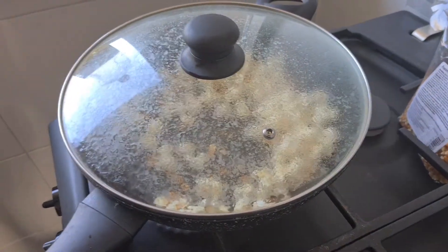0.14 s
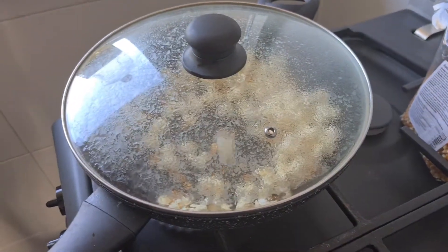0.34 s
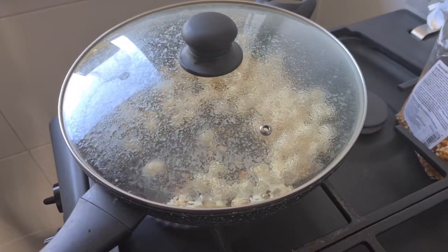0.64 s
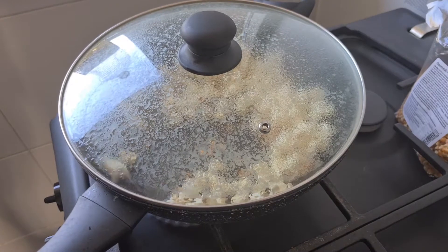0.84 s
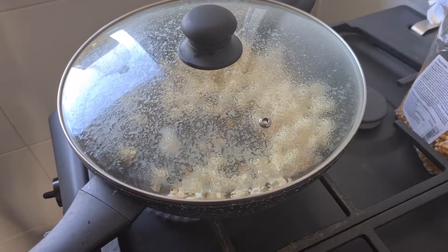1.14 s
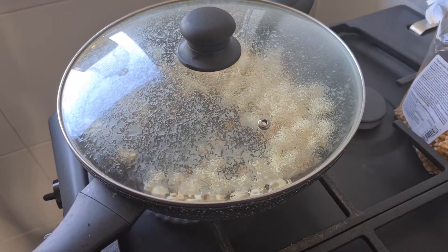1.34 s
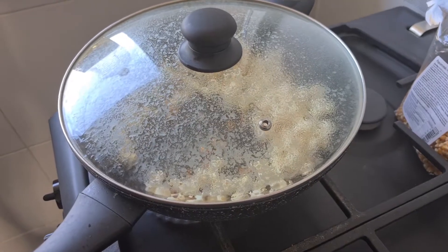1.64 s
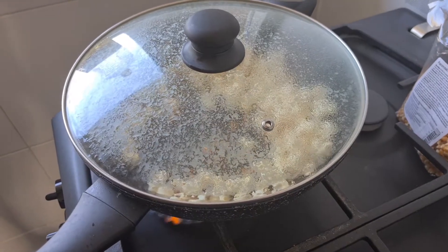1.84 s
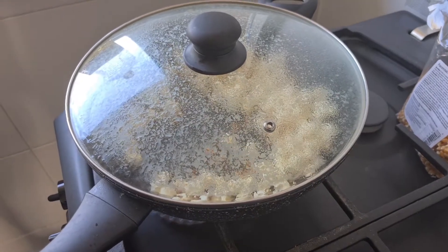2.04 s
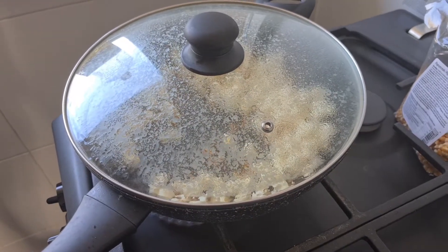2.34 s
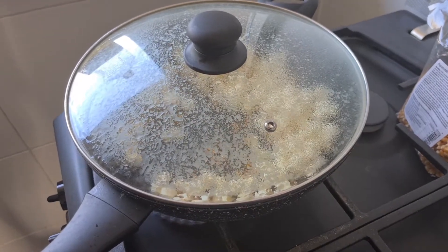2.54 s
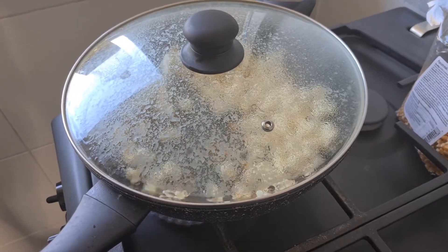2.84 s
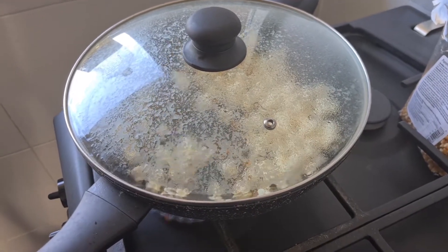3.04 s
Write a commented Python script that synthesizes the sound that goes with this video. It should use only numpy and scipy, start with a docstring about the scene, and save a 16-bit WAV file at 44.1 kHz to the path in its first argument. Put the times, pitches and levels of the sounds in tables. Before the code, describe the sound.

Popcorn pops in a covered frying pan. Faint stove rumble and spitting oil sizzle open with a pop's fading tail. Small pops come near 0.23 seconds, strong sharp cracks at 0.32 and 0.58, then more at 0.7, 1.0, a cluster around 1.27, and 1.77. After a sparser gap, pops quicken from 2.35 to 2.9. Kernels tap and ring the pan and lid; short kitchen reverberation.

```python
"""First a faint low stove rumble and oil sizzle, with the room tail of a pop; then popcorn bursts in a frying pan.
Place: a small kitchen, glass lid on the pan; two microphones, the left a little nearer, and diffuse reflections.
Each hull splits with a short crack of shaped noise and a low puff of steam that shakes the pan's low modes.
Cracks ring the pan and lid as decaying sines; flung kernels knock on them with a thud, a crunch and a ring.
Rumble and sizzle are steady coloured noise, the sizzle strewn with spitting droplets."""
import sys
import numpy as np
from scipy import signal
from scipy.fft import rfft, irfft
from scipy.io import wavfile
from scipy.ndimage import uniform_filter1d

SR = 44100
rng = np.random.default_rng(int(sys.argv[2]) if len(sys.argv) > 2 else 0)


def unload_audio(sound):
    """Save the sound as a 16-bit wav file, at the path given as the first command line argument."""
    columns = np.transpose(np.atleast_2d(sound))
    # keep every value between -1 and 1, then stretch to whole-number steps
    steps = np.round(np.clip(columns, -1, 1) * 32767)
    wavfile.write(sys.argv[1], SR, steps.astype(np.int16))


N = 141120

# Steady stove rumble, spectrum shape: f/Hz, level/dB per Hz
STOVE_COLOUR = [(30, -11.5), (55, 2), (100, -0.5), (165, -13.5), (225, -2.5), (320, -18.5), (1250, -15.5),
                (2200, -36)]
# Oil sizzle under the lid, spectrum shape: f/Hz, level/dB per Hz
SIZZLE_COLOUR = [(1500, -2), (2800, -10), (3230, -5.5), (3410, 10.5), (3650, -6.5), (4500, -7.5),
                 (5150, 0.5), (6000, -.5), (7000, -2), (7950, 5.5), (8800, -10.5), (10300, -10),
                 (11500, -4), (15000, -1)]
# Bursting kernels: peak t/s, crack level/dB, rise t/s, decay t/s, mids level/dB re crack,
# treble level/dB re crack, snap f/Hz, puff level/dB, left re right level/dB
POPS = [(-.045, -15, 0.0005, 0.0052, 3.5, -4, 6250, -35, -5.5),
        (0.2262, -19, .0007, 0.0044, -4.5, -13, 5900, -31, -2),
        (0.2319, -25.5, 0.001, 0.0042, -7, 4, 6070, -57, -1),
        (0.3185, -5.5, 0.0025, 0.0043, -1.5, -1.5, 6440, -27, 0),
        (0.5797, -7.5, 0.002, 0.0042, -0.5, -3.5, 6380, -25, 0.5),
        (.695, -14, 0.0011, 0.0029, 3, -1, 7130, -27.5, -2),
        (.996, -12, 0.0016, 0.0052, -1.5, .5, 7200, -30.5, 0.5),
        (1.2578, -16, 0.0018, 0.0039, 5, -8, 6040, -30.5, -0.5),
        (1.273, -12, 0.0037, 0.0029, -.5, 0, 7140, -34.5, 3.5),
        (1.3012, -13, 0.0025, 0.0046, 4, 0, 5560, -25, -3.5),
        (1.757, -14.5, 0.0011, 0.004, 0.5, -9, 6700, -27.5, -1),
        (1.7891, -17, 0.0018, 0.0062, 0.5, -3, 5950, -29.5, -1.5),
        (2.3461, -14, 0.0015, 0.0081, 1, -2, 6540, -33.5, 0),
        (2.493, -14, 0.0034, 0.0024, 2, 4.5, 7440, -28.5, .5),
        (2.5918, -20.5, 0.0037, 0.0024, 6, -2, 6100, -29.5, 2),
        (2.5979, -18, 0.0032, 0.0019, 7, 0.5, 6240, -51, 0.5),
        (2.7582, -23.5, .0006, 0.014, 4, -1.5, 5800, -37.5, 2),
        (2.7693, -18.5, .0006, 0.0045, -12, 0, 6000, -36, -5),
        (2.8578, -10.5, 0.0014, 0.0041, 3, 0.5, 7000, -25.5, 2.5),
        (2.8754, -14, 0.0018, 0.0046, 0.5, -0.5, 5650, -30, -3.5),
        (3.1985, -21.5, 0.001, 0.0042, 14.5, -1.5, 6300, -22, -1)]
# Bits of hull snapping: t/s, level/dB
TICKS = [(.268, -27), (.5414, -31.5), (.834, -28), (.8655, -30.5), (1.661, -33.5), (1.908, -35.5)]
# Colour of a crack: f/Hz, level/dB
CRACK_COLOUR = [(100, -42), (250, -11), (450, -28.5), (1000, -26.5), (1350, -19.5), (2000, -8),
                (4200, -4.5), (5200, -5.5), (6000, .5), (7500, 0), (8800, -8.5), (10200, -8), (12000, -1.5),
                (14500, 2.5)]
# Ringing modes of pan and lid: f/Hz, level/dB, t60/s
MODES = [(1009.4, -22, 0.094), (1628.7, -21, 0.15), (1672, -20.5, 0.11), (1941, -19.5, 0.067),
         (2202, -21, 0.12), (2506, -28, 0.16), (2689, -29.5, 0.27), (2740, -17.5, 0.12),
         (2869, -28.5, 0.21), (3247, -13, 0.073), (3910, -23.5, 0.16), (4400, -22, 0.13),
         (5750, -16.5, 0.059), (6410, -15, 0.057)]
# Low modes of the covered pan: f/Hz, level/dB struck by a kernel, level/dB shaken by a puff, t60/s
LOW_MODES = [(67.4, -22, -15.5, 0.095), (96.5, -40, -7, 0.089), (131, 0.5, -14.5, 0.22),
             (213, -15, -18.5, 0.042), (331.4, -3, -16, 0.032), (534, -19, -33.5, 0.5)]
# Flung kernels landing: t/s, low thud level/dB, knock level/dB, knock f/Hz,
# metallic ring level/dB, f/Hz that the spot favours
KNOCKS = [(.247, -64, -48, 600, -36.5, 1670), (0.357, -31, -45, 314, -39.5, 1000),
          (0.365, -47, -27.5, 1006, -34, 1960), (.369, -53, -29.5, 363, -40, 2730),
          (.607, -50, -37.5, 530, -30, 2250), (.675, -40.5, -42, 446, -33, 3270),
          (.722, -42.5, -46, 342, -48, 3300), (1.012, -36, -41.5, 332, -50, 2200),
          (1.048, -49, -38.5, 758, -39.5, 1620), (1.266, -43, -27.5, 1070, -34, 2180),
          (1.312, -35.5, -33.5, 1030, -35, 1630), (1.787, -36.5, -27, 1090, -37.5, 2600),
          (1.803, -39, -39.5, 326, -40, 1650), (1.955, -56, -51, 580, -47, 3900),
          (2.111, -57, -60, 805, -52.5, 2680), (2.427, -61, -40, 630, -51, 1000),
          (2.511, -56, -34.5, 986, -51, 2830), (2.594, -24.5, -25.5, 610, -31.5, 1640),
          (2.628, -62, -39, 685, -29.5, 2580), (2.665, -56, -35.5, 656, -41, 1680),
          (2.698, -51, -34.5, 646, -62, 1670), (2.877, -33, -46, 930, -26.5, 2840),
          (3.067, -57, -42, 610, -61, 1000)]
# Colour of the kitchen reverberation: f/Hz, level/dB
ROOM_COLOUR = [(50, -8), (150, -10), (300, 0.5), (3000, 0.5), (6500, -3.5), (10000, -1), (15000, -6)]
# Decay of the kitchen reverberation: f/Hz, t60/s
ROOM_T60 = [(60, 0.56), (3000, 0.31), (7000, .31), (15000, 0.18)]
# Likeness of the two channels in diffuse sound: f/Hz, correlation/0-1
LIKENESS = [(350, 0.99), (700, 1), (1400, 0)]

LEAD_S = 0.1  # run-in before the kept sound
TIME = np.arange(-int(LEAD_S * SR), N) / SR
RUN = len(TIME)  # samples, run-in included
FFT_SIZE = 2 ** 18
FREQS = np.maximum(np.arange(FFT_SIZE // 2 + 1) * SR / FFT_SIZE, 1)

STOVE_DB, SIZZLE_DB = -52.5, -48.5
SPITS_PER_S, SPIT_DB = 25, 19  # droplets in the hot oil; height re the hiss
CRACK_LIKENESS = 0.27  # channel correlation of the crack noise, 0-1
CRACK_GRAIN_DB, GRAINS_PER_S = 4, 3000
TICK_RISE_S, TICK_DECAY_S = 0.0016, 0.0044
SNAP_DB, SNAP_WIDTH_HZ = 0.5, 460  # resonance of a splitting hull
TREBLE_PAN_DB = -5  # crack treble leans to the right
PUFF_WIDTH_S, PUFF_DELAY_S, PUFF_PULSE_DB, PUFF_NOISE_DB = 0.00064, 0.0016, -4.5, 20
CRACK_RING_DB, KNOCK_RING_DB = -28, 7
RING_DETUNE, RING_SPREAD_DB = 0.0053, 5  # random spread of each mode's pitch (fraction) and level
SPOT_DB, SPOT_OCTAVES = 5, 0.094  # a spot favours the modes near one pitch
SOFT_CONTACT_HZ = 3870  # soft kernels barely excite modes well above this
CONTACT_DB, CONTACT_WIDTH_HZ, CONTACT_S = 11, 1200, 0.0017  # crunch of a kernel as it lands
KNOCK_DB, KNOCK_T60_S = 5, 0.026
# Sends to the reverberation; the knock is heard mostly direct
CRACK_ROOM_DB, PAN_ROOM_DB, KNOCK_ROOM_DB = -4, -4, -7
RIGHT_LAG_S = 0.0003764  # later arrival at the right microphone
CUTOFF_HZ = 15800


def from_db(db):
    """Decibels to gain."""
    return 10 ** (np.asarray(db) / 20)


def rms_one(x):
    """Scale to unit rms."""
    return x / np.sqrt(np.mean(x ** 2) + 1e-20)


def at_hz(points, hz):
    """Read a table on a log-frequency axis."""
    f, value = np.transpose(points)
    return np.interp(np.log(hz), np.log(f), value)


def colour(x, spectrum):
    """Causal (minimum-phase) filter with the given dB curve."""
    cepstrum = irfft(np.log(from_db(at_hz(spectrum, FREQS))))
    # fold the cepstrum onto positive time
    cepstrum[1:FFT_SIZE // 2] *= 2
    cepstrum[FFT_SIZE // 2 + 1:] = 0
    response = np.exp(rfft(cepstrum))
    return irfft(rfft(x, FFT_SIZE) * response)[..., :RUN]


def stereo_noise(likeness):
    """White noise in two channels with the given correlation."""
    mid, side = rfft(rng.standard_normal((2, FFT_SIZE)))
    c = np.clip(likeness, 0, 1)
    shared = np.sqrt((1 + c) / 2) * mid
    opposed = np.sqrt((1 - c) / 2) * side * [[1], [-1]]
    return irfft(shared + opposed)[:, :RUN]


def grainy(depth_db):
    """Rapid random gain that breaks a noise into tiny snaps."""
    knots = np.arange(RUN) * GRAINS_PER_S / SR
    wander = np.interp(knots, np.arange(RUN), rng.standard_normal(RUN))
    return rms_one(from_db(depth_db * wander))


def evened(x):
    """Hold a noise at a steady strength from one fracture to the next, keeping its fine grain."""
    power = uniform_filter1d(x ** 2, size=180, axis=-1)
    return x * np.sqrt(np.mean(x ** 2) / np.maximum(power, 1e-12))


def ring(x, hz, t60):
    """One mode: a unit click rings as a decaying sine of initial height 1."""
    r = from_db(-60 / (t60 * SR))
    w = 2 * np.pi * hz / SR
    return signal.lfilter([0, np.sin(w)], [1, -2 * r * np.cos(w), r * r], x + 1e-18)


def resonance(x, hz, width_hz):
    """A broad resonance with about unit gain at its centre."""
    r = np.exp(-np.pi * width_hz / SR)
    zeros = np.array([1, 0, -1]) * (1 - r * r) / 2
    poles = [1, -2 * r * np.cos(2 * np.pi * hz / SR), r * r]
    return signal.lfilter(zeros, poles, x)


def clicks(s, db):
    """One click at each time."""
    out = np.zeros(RUN)
    np.add.at(out, np.minimum(np.searchsorted(TIME, s), RUN - 1), from_db(db))
    return out


def burst(s, rise_s, decay_s):
    """Envelope of a fracture: it runs away to a peak, then dies."""
    age = TIME - s
    return np.exp(-np.minimum(np.maximum(-age / rise_s, age / decay_s), 20))


def panned(db):
    """Left and right gains for a level difference; positive leans left."""
    return from_db([[db / 2], [-db / 2]])


def at_microphones(x):
    """The pan is a little nearer the left microphone, so the right hears it later."""
    left, right = np.broadcast_to(x, (2, RUN))
    return np.array([left, np.interp(TIME - RIGHT_LAG_S, TIME, right)])


def stove_and_oil():
    """Low rumble of the stove; fine sizzle and spitting droplets coloured by the lid."""
    rumble = rms_one(colour(stereo_noise(at_hz(LIKENESS, FREQS)), STOVE_COLOUR))
    spits = (rng.random(RUN) < SPITS_PER_S / SR) * rng.standard_normal(RUN)
    oil = stereo_noise(0) + from_db(SPIT_DB) * at_microphones(spits)
    sizzle = rms_one(colour(oil, SIZZLE_COLOUR))
    return from_db(STOVE_DB) * rumble + from_db(SIZZLE_DB) * sizzle


def cracks():
    """Splitting hulls, each with its own brightness and snap pitch; returns the sound and the force on the pan."""
    noise = rfft(stereo_noise(CRACK_LIKENESS) * grainy(CRACK_GRAIN_DB), FFT_SIZE)
    edges = [0, 1400, 4800, 9000, SR]  # Hz
    bands = []
    for lo, hi in zip(edges, edges[1:]):
        band = irfft(noise * ((FREQS >= lo) & (FREQS < hi)))[:, :RUN]
        bands.append(evened(band))
    steam, mids, core, treble = bands
    treble = treble * panned(TREBLE_PAN_DB)

    tick_envelope = sum(from_db(db) * burst(s, TICK_RISE_S, TICK_DECAY_S) for s, db in TICKS)
    force = (core + mids + treble) * tick_envelope
    for s, db, rise_s, decay_s, mids_db, treble_db, snap_hz, puff_db, pan_db in POPS:
        hull = core + from_db(mids_db) * mids + from_db(treble_db) * treble
        source = from_db(db) * hull + from_db(puff_db + PUFF_NOISE_DB) * steam
        pop = burst(s, rise_s, decay_s) * source * panned(pan_db)
        snap = from_db(SNAP_DB) * resonance(pop, snap_hz, SNAP_WIDTH_HZ)
        force = force + pop + snap
    return colour(force, CRACK_COLOUR), force


def ringing_pan(force):
    """The force of the cracks sets every mode of pan and lid ringing."""
    return sum(from_db(db + CRACK_RING_DB) * ring(force, hz, t60) for hz, db, t60 in MODES)


def puffs():
    """Released steam gives one pressure pulse and shakes the low modes of the pan."""
    s, db = np.array(POPS)[:, 0], np.array(POPS)[:, 7]
    # the shake starts 1 ms ahead of the crack's peak
    out = sum(ring(clicks(s - 0.001, db + mode_db), hz, t60) for hz, _, mode_db, t60 in LOW_MODES)
    for start, level_db in zip(s, db):
        u = np.clip((TIME - start - PUFF_DELAY_S) / PUFF_WIDTH_S, -10, 10)
        out = out + from_db(level_db + PUFF_PULSE_DB) * np.exp(-u * u / 2)
    return -out


def metal_ring(s, ring_db, spot_hz):
    """Each spot on pan or lid brings out the modes near its own pitch."""
    span = SR // 2
    out = np.zeros(RUN + SR)
    age = np.arange(span) / SR
    hz, db, t60 = np.array(MODES).T[:, :, None]
    softness = 1 / (1 + (hz / SOFT_CONTACT_HZ) ** 4)
    decay = np.exp(-np.log(1000) * age / t60)
    for start, level_db, favoured_hz in zip(np.searchsorted(TIME, s), ring_db, spot_hz):
        detune, strength, side = rng.standard_normal((3, len(MODES), 1))
        octaves_off = np.log2(hz / favoured_hz)
        spot_db = SPOT_DB * np.exp(-(octaves_off / SPOT_OCTAVES) ** 2 / 2)
        mode_db = level_db + db + spot_db + KNOCK_RING_DB + RING_SPREAD_DB * strength
        gain = np.sign(side) * softness * from_db(mode_db)  # random polarity
        tone = np.sin(2 * np.pi * hz * (1 + RING_DETUNE * detune) * age)
        out[start:start + span] += np.sum(gain * tone * decay, axis=0)
    return out[:RUN]


def knocks():
    """Soft kernels strike pan and lid; returns thud, crunch and metallic ring together, and the damped knock."""
    s, thud_db, _, _, ring_db, spot_hz = np.transpose(KNOCKS)
    thud = sum(ring(clicks(s, thud_db + db), hz, t60) for hz, db, _, t60 in LOW_MODES)
    knock = sum(ring(clicks([t], db + KNOCK_DB), hz, KNOCK_T60_S) for t, _, db, hz, _, _ in KNOCKS)
    grit = rng.standard_normal(RUN)
    crunch = 0
    for t, db, hz in zip(s, ring_db, spot_hz):
        contact = from_db(db + CONTACT_DB) * grit * burst(t, TICK_RISE_S, CONTACT_S)
        crunch = crunch + resonance(contact, hz, CONTACT_WIDTH_HZ)
    return thud + crunch + metal_ring(s, ring_db, spot_hz), knock


def kitchen(x):
    """Diffuse reflections that die faster in the treble."""
    noise = rfft(stereo_noise(at_hz(LIKENESS, FREQS))[:, :SR])
    age, hz = np.arange(SR) / SR, np.arange(SR // 2 + 1)
    edges = [20, 200, 600, 1500, 4500, 9000, 20000]  # Hz
    tail = 0
    for lo, hi in zip(edges, edges[1:]):
        fade = from_db(-60 * age / at_hz(ROOM_T60, np.sqrt(lo * hi)))
        fade = fade * np.minimum(age / 0.011, 1)  # reflections build up over 11 ms
        band = irfft(noise * ((hz >= lo) & (hz < hi)))
        tail = tail + band * fade / np.sqrt(np.sum(fade ** 2))
    reverberation = irfft(rfft(x, FFT_SIZE) * rfft(tail, FFT_SIZE))[:, :RUN]
    return colour(reverberation, ROOM_COLOUR)


def scene():
    """Pops, pan and knocks in the kitchen, over the steady beds."""
    crack, force = cracks()
    struck, knock = knocks()
    pan = struck + ringing_pan(force)
    puff = puffs()
    sent = from_db(CRACK_ROOM_DB) * crack + puff
    sent = sent + from_db(PAN_ROOM_DB) * pan + from_db(KNOCK_ROOM_DB) * knock
    room = kitchen(sent)
    direct = at_microphones(crack + pan + knock + puff)
    return (direct + room + stove_and_oil())[:, -N:]


def record(dry):
    """The microphone drops the deepest bass; the top is cut."""
    bass_cut = signal.butter(4, 40, "high", fs=SR, output="sos")
    top_cut = signal.ellip(10, 0.2, 80, CUTOFF_HZ, fs=SR, output="sos")
    return signal.sosfilt(top_cut, signal.sosfilt(bass_cut, dry))


dry = scene()
out = record(dry)
unload_audio(out)
```